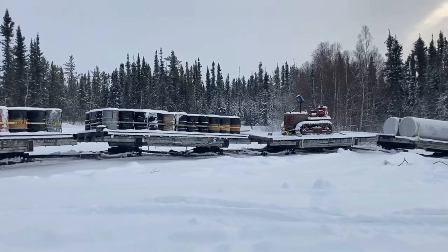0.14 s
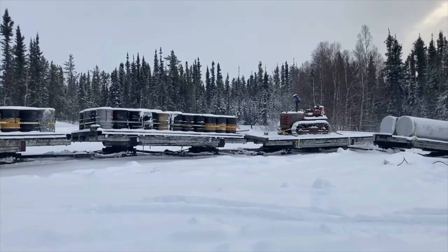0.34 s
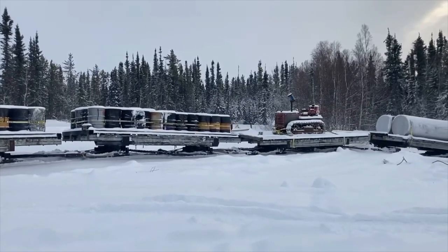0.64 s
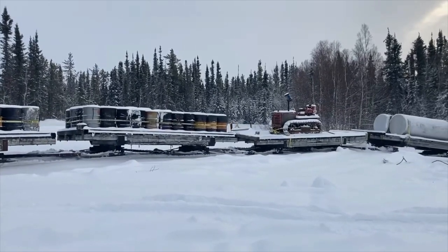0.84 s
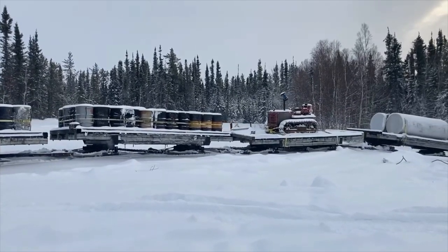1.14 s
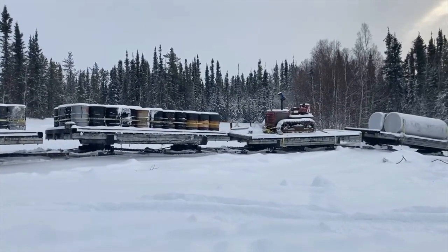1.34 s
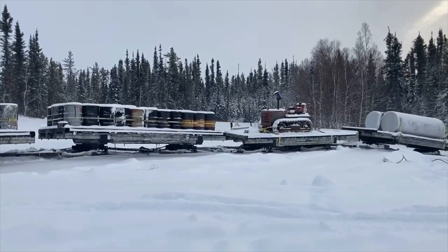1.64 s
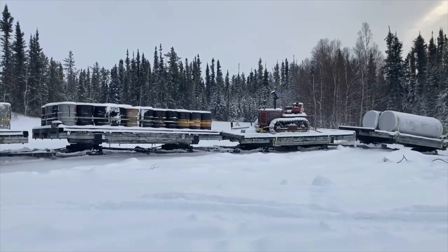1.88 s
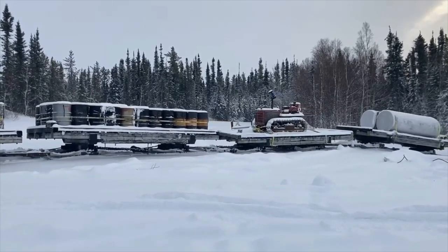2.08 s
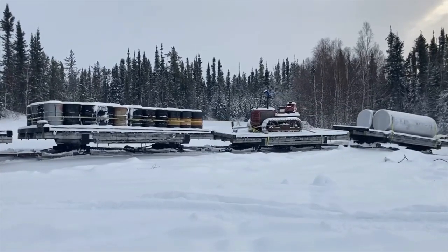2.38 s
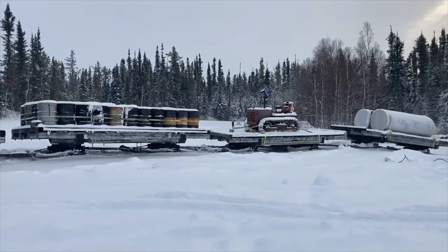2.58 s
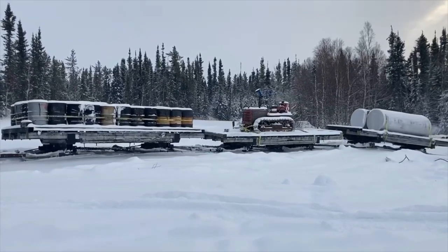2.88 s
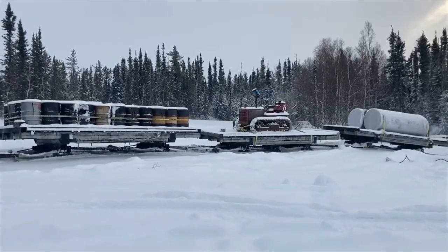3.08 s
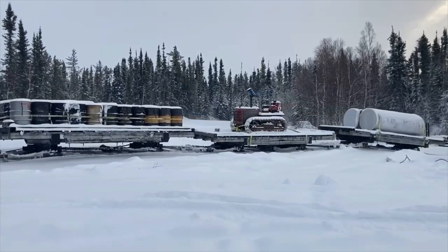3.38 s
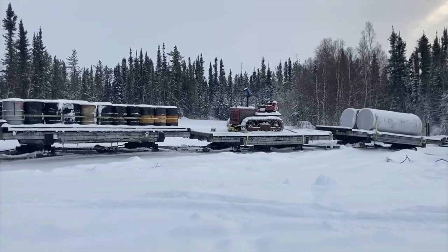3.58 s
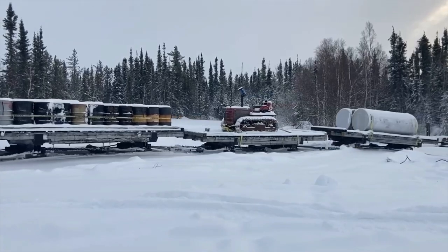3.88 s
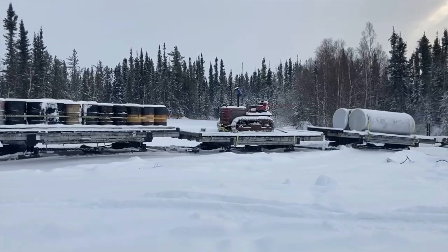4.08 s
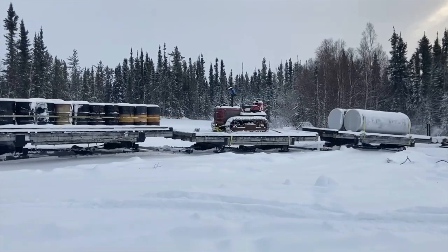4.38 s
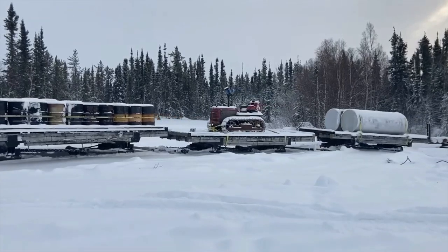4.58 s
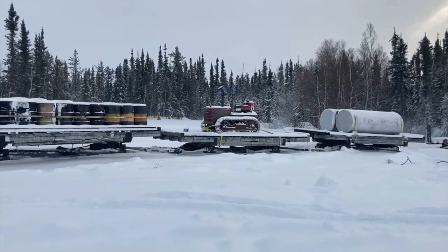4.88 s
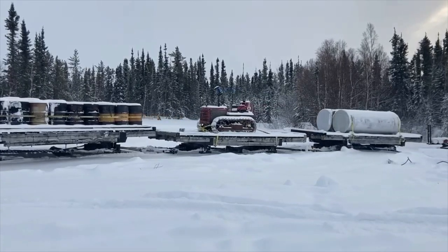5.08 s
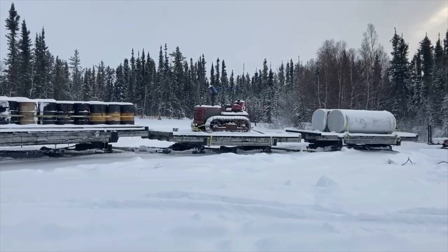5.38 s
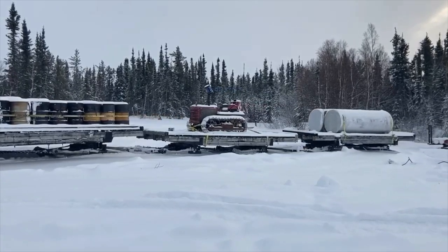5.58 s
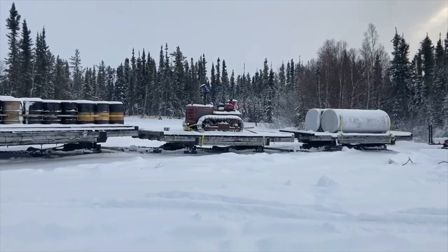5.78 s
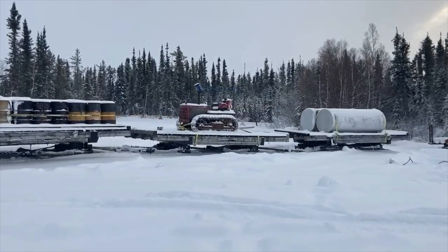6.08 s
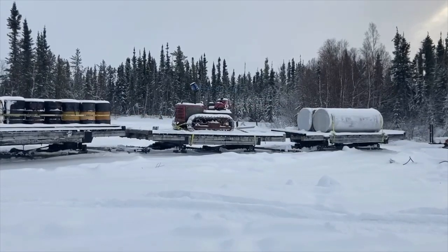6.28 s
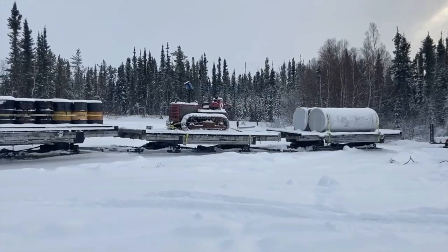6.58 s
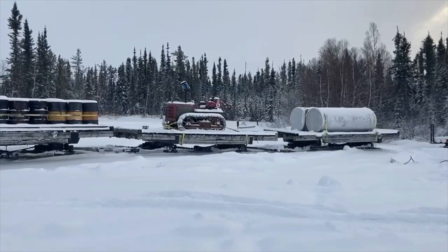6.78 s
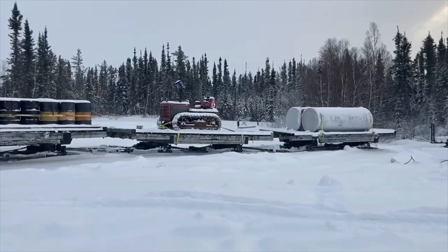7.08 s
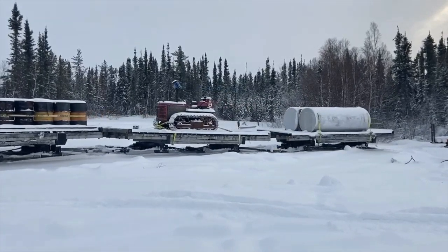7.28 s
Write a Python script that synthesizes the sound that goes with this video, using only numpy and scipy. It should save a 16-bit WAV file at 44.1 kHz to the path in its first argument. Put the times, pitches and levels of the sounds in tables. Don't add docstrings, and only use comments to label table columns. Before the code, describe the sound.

A rapid, uneven diesel clatter rides on a deep exhaust hum and rough fan and track roar. The engine labors early, drops slightly in pitch and recovers to a steadier, lighter pull. Metallic pins clink and a chain snaps taut, while dragged sleighs rub over packed snow, more audible toward the end. Open winter air, slightly wide stereo, slightly gritty handheld sound.

```python
import sys
import numpy as np
from scipy import signal
from scipy.fft import rfft, irfft, next_fast_len
from scipy.io import wavfile
from scipy.ndimage import uniform_filter1d

SR = 44100
rng = np.random.default_rng(int(sys.argv[2]) if len(sys.argv) > 2 else 0)


def inscribe(sig):
    pcm = np.round(np.clip(np.atleast_2d(sig).T, -1, 1) * 32767)
    wavfile.write(sys.argv[1], SR, pcm.astype(np.int16))


def amp(db):
    return 10 ** (np.asarray(db, float) / 20)


N = 328104


def rms_one(x):
    return x / np.sqrt(np.mean(x ** 2))


def in_time(rows):
    start_s, *columns = np.transpose(rows)
    return [np.interp(np.arange(N) / SR, start_s, column) for column in columns]


def colour(x, spectrum):
    pitch_hz, level_db = np.transpose(spectrum)
    size = next_fast_len(N + 4096)
    bin_hz = np.arange(size // 2 + 1) * SR / size
    gain = amp(np.interp(np.log(bin_hz + 1), np.log(pitch_hz), level_db))
    return irfft(rfft(x, size) * gain, size)[..., :N]


def resonance(x, hz, width):
    r = np.exp(-np.pi * width / SR)
    feedback = [1, -2 * r * np.cos(2 * np.pi * hz / SR), r * r]
    return signal.lfilter([(1 - r * r) / 2, 0, (r * r - 1) / 2], feedback, x)


def drift(rate):
    lowpass = signal.butter(2, rate, fs=SR, output="sos")
    return rms_one(signal.sosfilt(lowpass, rng.standard_normal(N + SR))[SR:])


def turning():
    return np.minimum(np.arange(N) / SR, 3.43)


def follow(control_db, level_db, share, lag_s, away_db):
    mean_control_db = -24
    r = np.exp(-1 / (max(lag_s, .001) * SR))
    start_db = control_db[0]
    lagged_db = signal.lfilter([1 - r], [1, -r], control_db - start_db) + start_db
    return level_db + share * (lagged_db - mean_control_db) + away_db * np.arange(N) / SR


def runner_hiss():
    # pitch_hz, level_db per Hz
    snow = [(200, -21.5), (450, -4), (680, 0), (1100, -5), (2000, -22), (5000, -48)]
    # start_s, level_db
    runners = [(0, -35.5), (1.2, -35), (2.4, -36), (3.4, -31.5), (4.6, -28.5), (6.0, -30.5), (7.44, -27)]
    hiss = rms_one(colour(rng.standard_normal((3, N)) * amp(2.4 * drift(6.8)), snow))
    scatter_db = [[0], [5], [5]]
    return amp(in_time(runners)[0] + scatter_db) * hiss


def stack_rumble(pulse_db):
    # pitch_hz, level_db per Hz
    turbulence = [(15, -26), (50, -6), (115, -14), (230, -7), (430, -5), (520, -10), (1500, -50)]
    return amp(0.39 * pulse_db - 19.0) * rms_one(colour(rng.standard_normal((3, N)), turbulence))


def fan_and_track_roar(thud, roar_db):
    # pitch_hz, level_db per Hz
    roar_spectrum = [(250, -9), (500, -1.3), (900, 1), (1500, -0.4), (2000, 0.4), (2700, -1.2), (3700, -9),
                     (6000, -13.5), (11000, -21.5), (12000, -46), (13000, -90)]
    throb = amp(1.92 * drift(23)) * (1 + 0.42 * thud)
    roar = rms_one(colour(rng.standard_normal((3, N)) * throb, roar_spectrum))
    cowl_db = -1 - 4 * np.maximum(turning() - 1.5, 0)
    roar += amp(cowl_db) * resonance(roar, hz=1350, width=700)
    return amp(roar_db + 0.2) * roar


def chain():
    # start_s, peak_db
    snaps = [(2.0313, -27), (2.511, -22), (2.8998, -26), (2.9492, -12.5), (2.9991, -37), (3.05, -18),
             (3.0974, -21), (4.5261, -22)]
    # pitch_hz, width_hz, level_db
    link = [(4230, 590, 10), (6100, 530, 22), (11000, 900, 11)]
    start_s, peak_db = np.transpose(snaps)
    clicks = np.zeros(N)
    clicks[(start_s * SR).astype(int)] = amp(peak_db)
    clicks += 1e-18
    return sum(amp(level_db) * resonance(resonance(clicks, hz, width), hz, 2 * width)
               for hz, width, level_db in link)


def clanks():
    # start_s, pitch_hz, level_db
    pins = [(0.0517, 11370, -41.3), (0.125, 10510, -28.6), (0.4196, 4310, -23.7), (0.4914, 10160, -31.3),
            (1.3643, 5510, -28.2), (1.4442, 10680, -33.1), (1.5262, 4130, -25.6), (1.7119, 3450, -25.1),
            (1.8433, 3100, -22.0), (2.0827, 4310, -20.3), (2.1117, 3450, -24.3), (2.2155, 4650, -21.1),
            (2.3178, 4310, -17.8), (2.3294, 3100, -19.7), (2.3432, 5510, -25.0), (2.5116, 6720, -27.7),
            (2.6248, 3960, -24.0), (2.7009, 4480, -21.1), (2.7532, 3960, -24.5), (2.7757, 3960, -23.8),
            (2.8004, 5860, -20.3), (2.9244, 9990, -34.0), (2.9484, 6200, -24.3), (3.013, 4310, -24.7),
            (3.1494, 4310, -25.3), (3.3177, 5340, -26.4), (3.3663, 3790, -25.3), (3.5151, 10850, -34.1),
            (3.6624, 5860, -28.7), (3.7654, 4130, -26.9), (3.8112, 6200, -31.5), (3.8148, 4310, -25.8),
            (3.9091, 8440, -30.9), (4.4287, 5680, -28.2), (4.5259, 3270, -23.1), (4.5513, 3960, -24.2),
            (4.5745, 9130, -33.2), (4.8299, 3960, -27.2), (4.8408, 4310, -25.4), (4.9177, 4130, -26.2),
            (4.9881, 3790, -27.7), (5.0142, 5170, -30.5), (5.4329, 3450, -26.1), (5.8785, 4310, -25.1),
            (6.1012, 3960, -29.8), (6.1767, 9990, -39.9), (6.353, 5340, -28.3), (6.4031, 5680, -30.9),
            (6.9836, 5680, -29.4), (7.1323, 3620, -27.4), (7.2056, 5680, -21.6), (7.2296, 5510, -30.6),
            (7.2789, 5680, -24.2), (7.329, 4650, -26.6), (7.4277, 3620, -27.8), (7.4277, 5680, -28.9)]
    rise_s, fade_s = 0.0009, 0.007
    start_s, hz, db = np.array(pins).T[:, :, None]
    since = np.arange(SR // 40) / SR
    shape = (1 - np.exp(-since / rise_s)) * np.exp(-since / fade_s)
    neighbour_hz = hz * rng.uniform(.95, 1.05, hz.shape)
    pair = np.sin(2 * np.pi * hz * since) + .5 * np.sin(2 * np.pi * neighbour_hz * since)
    out = np.zeros(N + SR)
    at = (start_s * SR).astype(int) + np.arange(SR // 40)
    np.add.at(out, at, amp(db - 2) * shape / shape.max() * pair)
    return out[:N]


def bonnet(turns):
    # start_firings, level_db
    slaps = [(3.95, 0), (.85, -2), (4.5, -5), (3.15, -6), (5.0, -3), (1.85, -4), (5.65, -4), (1.2, -6)]
    # pitch_hz, width_hz, level_db, rise_db per second of turning
    panels = [(403, 20, -2.5, 0), (500, 90, -11.5, 0.5), (594, 130, -12, 4.5), (657, 108, -13, 2.5)]
    cycle = 6 * np.arange(int(turns[-1] / 6) - 1)[:, None]
    firing, slap_db = np.transpose(slaps)
    chance = rng.standard_normal((len(cycle), 2, len(slap_db)))
    at = np.interp(cycle + firing + .012 * chance[:, 0], turns, np.arange(N)).astype(int)
    clicks = np.zeros(N)
    clicks[at] = amp(slap_db + 1.8 * chance[:, 1])
    clicks += 1e-18
    rings = [amp(db + rise * turning()) * rms_one(resonance(resonance(clicks, hz, width), hz, 2 * width))
             for hz, width, db, rise in panels]
    return amp(-40) * sum(rings)


def knock_shape(turns, load, strain_db):
    # lag_firings, length_firings, tick_db light load, tick_db full load, thud_db
    knocks = [(0.22, 0.18, -7, -3.5, -18), (0.19, 0.17, -11, 0, -12.5), (0.16, 0.16, -10, -5.5, 0),
              (0.17, 0.081, -11, -4, -20), (0.079, 0.22, -0.5, -1.5, 6), (0.24, 0.16, -13, -3, 2.5)]
    # start_s, peak_db
    hard_firings = [(0.0548, -9), (0.126, -12), (0.1984, -19), (0.2728, -16), (0.416, -13.5), (0.7048, -13),
                    (0.85, -10), (0.9226, -18.5), (1.068, -13), (1.289, -14), (1.365, -13), (1.5213, -8.5),
                    (1.5995, -8), (1.643, -11.5), (1.7644, -12.5), (1.83, -15), (1.938, -19), (2.0823, -10),
                    (2.16, -19), (2.214, -10), (2.304, -23), (2.406, -8), (2.469, -13), (2.586, -13),
                    (2.6233, -11), (2.698, -14), (2.7242, -21), (2.7736, -9), (2.8474, -20), (2.9003, -20),
                    (3.1448, -11.5), (3.368, -11), (3.5134, -13), (3.588, -11), (3.66, -11.5),
                    (3.7973, -21), (3.8831, -16), (3.9586, -10), (4.0318, -9), (4.1067, -13), (4.3998, -11),
                    (4.474, -13), (4.5256, -16.5), (4.5487, -8), (4.695, -10.5), (4.7685, -21),
                    (4.913, -16.5), (4.987, -16), (5.3544, -19), (5.429, -13.5), (5.5054, -15.5),
                    (5.8002, -16), (5.8747, -11), (6.6927, -14), (6.764, -14.5), (7.0564, -24),
                    (7.13, -14.5), (7.202, -11), (7.277, -10.5), (7.424, -12)]
    lag, length, light_db, full_db, thud_db = np.transpose(knocks)
    chance = np.clip(rng.standard_normal((int(turns[-1]) + 3, 4)), -2, 1.2) * [.03, .7, 1.1, 1.6]
    number = np.floor(turns + .35).astype(int) + 1
    start_s, peak_db = np.transpose(hard_firings)
    top = ((start_s + 0.0031) * SR).astype(int)
    struck = number[top]
    over_db = peak_db - strain_db[top]
    hard = np.zeros(len(chance), bool)
    hard[struck] = True
    chance[struck, 0] = np.clip(turns[top] + 1.02 - struck - lag[(struck - 1) % 6], -.25, .25)
    chance[struck, 1:] = 0.72 * (over_db - over_db.mean())[:, None] / 2
    cylinder = (number - 1) % 6
    slip, both_db, tick_db, dull_db = chance[number].T
    hard = hard[number]
    late = turns + 1.02 - number - lag[cylinder] - slip
    soft_width = length[cylinder] * np.where(late < 0, .88, 1.1)
    width = np.where(hard, np.where(late < 0, .17, .18), soft_width)
    bell = np.exp(-.5 * (late / width) ** 2)
    soft_db = light_db[cylinder] * (1 - load) + full_db[cylinder] * load
    bright_db = np.where(hard, 2, soft_db)
    thud = bell * amp(thud_db[cylinder] + both_db + dull_db)
    return bell, bright_db + both_db + tick_db, thud


def uneven_ticks(metal, bell, tick_db, turns):
    edges = [0, 3000, 5400, 8000, 10000, 22050]
    bite = [.62, .8, 1.05, 1.1, 1.0]
    hz = np.arange(N // 2 + 1) * SR / N
    own = amp(2.0 * np.clip(rng.standard_normal((int(turns[-1]) + 3, len(edges))), -2, 2))
    number = np.floor(turns + 1.35).astype(int)
    total = 0
    for k, (low, high) in enumerate(zip(edges, edges[1:])):
        strength = .22 + bell * amp(bite[k] * tick_db) * own[number, k]
        total = total + rfft(metal * strength) * ((hz >= low) & (hz < high))
    return irfft(total, N)


def block_knock(turns, bell, tick_db, knock_db):
    # pitch_hz, level_db per Hz
    tick = [(1000, -6.5), (2000, 3.5), (3000, -7.5), (3750, -4), (4200, 1.5), (5200, -2.5), (5800, -4.5),
            (7500, -7.5), (8200, -2.5), (10000, -13), (10800, -13), (11700, -16), (12000, -24),
            (13000, -52)]
    # pitch_hz, width_hz, level_db
    castings = [(1850, 120, -7), (4230, 140, 0), (6720, 130, -10), (10930, 230, -3)]
    metal = rng.standard_normal((3, N)) * amp(1.2 * rng.standard_normal((3, N)))
    ticks = colour(uneven_ticks(metal, bell, tick_db, turns), tick)
    rings = sum(amp(db) * resonance(ticks, hz, width) for hz, width, db in castings)
    return amp(knock_db + 1.5) * rms_one(ticks + rings)


def exhaust_pulses(turns, load):
    pulses = [(0.39, 0.027), (-0.55, 0.00071), (-0.22, -0.045), (0.37, 0.013), (-0.33, -0.045),
              (-0.25, -0.032)]
    # pitch_hz, width_hz, level_db, rise_db per second of turning
    stack = [(57.7, 13, -11, 0.5), (193.9, 2.7, 9.5, 2.2), (221.5, 15.5, 1.5, 2), (238.2, 37, 1, 2.84),
             (314, 70, -15.5, 2.5), (425, 22, -5, -1.5), (720, 240, -18, 4.5)]
    excess, lag = np.transpose(pulses)
    number = np.arange(int(turns[-1]))
    cylinder = number % 6
    chance = rng.standard_normal((len(number), 2))
    at = np.interp(number + .25 + lag[cylinder] + 0.004 * chance[:, 0], turns, np.arange(N)).astype(int)
    strength = 0.76 + excess[cylinder] * (1.2 - 0.25 * load[at])
    clicks = np.zeros(N)
    clicks[at] = -strength * (1 + 0.016 * chance[:, 1])
    puffs = signal.sosfilt(signal.butter(4, 500, fs=SR, output="sos"), clicks + 1e-18)
    rings = sum(amp(db + rise * turning()) * resonance(puffs, hz, width) for hz, width, db, rise in stack)
    rings -= .45 * (1 - load) * resonance(rings, hz=163, width=35)
    return rings / np.sqrt(uniform_filter1d(rings ** 2, size=SR // 4))


def firing_hum(turns, hum_db, load):
    # multiple of firing rate, level_db
    suborders = [(.5, -45), (2 / 3, -38.5), (5 / 6, -44)]
    # multiple, level_db, rise_db per second of turning, lug_db under load, push (sign is phase)
    upper_orders = [(2, -45, -0.5, -5, 1), (13 / 6, -34.5, -2.9, -13, -1), (15 / 6, -44, -0.5, -15, 1),
                    (17 / 6, -42.5, -1.1, -3, 1), (21 / 6, -48.5, -.4, 3, -1), (4.5, -48.5, 2, 13, 2.5),
                    (26 / 6, -42, 1.5, -3, 1), (28 / 6, -42, -1, 0.1, 1), (29 / 6, -46.5, -0.77, 0.1, 1),
                    (4.5, -53, -3, 8, 0.5), (31 / 6, -43.5, -0.86, -4, -1), (32 / 6, -43, -0.35, 3.3, -1),
                    (4.5, -65, -1, 14, -2)]
    phase = 2 * np.pi * turns
    hum = amp(hum_db + 0.29 * drift(7.5)) * np.cos(phase)
    for multiple, db in suborders:
        hum += amp(db) * np.cos(multiple * phase)
    for multiple, db, rise, lug_db, push in upper_orders:
        order = np.round(6 * multiple) / 6
        hum += np.sign(push) * amp(db + rise * turning() + lug_db * load) * np.cos(order * phase)
    return np.sqrt(2) * hum


def ports(direct, scattered):
    # pitch_hz, width_hz
    port_steps = [(570, 1070), (1820, 600), (2730, 420), (3700, 260), (4880, 480), (6100, 280), (7760, 400),
                  (10200, 700)]
    # pitch_hz, level_db
    balance = [(60, 0.0), (150, 0.0), (350, 1.0), (860, 0.5), (2090, -0.5), (5070, -0.5), (12300, 0.0)]
    # pitch_hz, level_db
    trees = [(40, -9), (100, -11), (200, -12), (500, -10.5), (1200, -9), (1700, -5.5), (3300, -4),
             (5500, 0), (7000, -4), (9000, 0.5), (11000, 0)]
    size = next_fast_len(N + 4096)
    hz = np.arange(size // 2 + 1) * SR / size
    half_cycles = sum(np.clip((hz - at) / width + .5, 0, 1) for at, width in port_steps)
    balance_hz, balance_db = np.transpose(balance)
    lead = np.exp(.5j * np.pi * half_cycles)
    lead *= amp(np.interp(np.log(hz + 1), np.log(balance_hz), balance_db) / 2)
    near = rfft(direct, size)
    return irfft([near * lead, near / lead], size)[:, :N] + colour(scattered, trees)


def scene():
    # start_s, speed_rpm
    speed = [(0.0, 1602.0), (0.51, 1676.0), (1.15, 1645.3), (1.49, 1524.2), (1.78, 1477.2), (2.2, 1533.1),
             (2.92, 1617.3), (3.4, 1625.0), (3.97, 1620.6), (4.88, 1643.2), (6.17, 1589.0), (6.46, 1640.6),
             (6.71, 1655.9), (7.44, 1619.0)]
    # start_s, level_db
    effort = [(0.0, -26), (0.06, -24.5), (0.68, -26.5), (1.18, -26.5), (1.6, -22), (1.9, -21.5),
              (3.21, -25.5), (4.72, -26.5), (5.22, -28), (5.62, -27), (5.74, -28), (6.36, -27), (6.4, -28),
              (6.94, -30), (7.4, -28), (7.44, -26.5)]
    # start_s, level_db
    clatter = [(0.0, -28.5), (0.14, -29), (1.04, -32.5), (2.15, -27), (2.2, -25.5), (4.35, -30.5),
               (4.54, -28.5), (6.67, -32.5), (6.69, -31.5), (6.86, -34), (7.19, -28.5), (7.44, -30.5)]
    # level_db at mean, share of swing, lag_s, away_db per second
    effort_rules = [(-22.5, 1.9, .002, 0.63), (-25, 1.51, 0.24, -0.09)]
    # level_db at mean, share of swing, lag_s, away_db per second
    strain_rules = [(-27.5, 1.32, .002, -0.075), (-25, 0.84, .002, 0.027)]
    turns = -.305 + np.cumsum(in_time(speed)[0]) / 20 / SR
    hum_db, pulse_db = [follow(in_time(effort)[0], *rule) for rule in effort_rules]
    knock_db, roar_db = [follow(in_time(clatter)[0], *rule) for rule in strain_rules]
    load = np.clip((hum_db + 27.0) / 9.9, 0, 1)
    bell, tick_db, thud = knock_shape(turns, load, knock_db)
    noise = runner_hiss() + stack_rumble(pulse_db) + fan_and_track_roar(thud, roar_db)
    noise += block_knock(turns, bell, tick_db, knock_db)
    direct = noise[0] + chain() + clanks() + bonnet(turns)
    direct += amp(pulse_db + 2.5) * exhaust_pulses(turns, load) + firing_hum(turns, hum_db, load)
    thinning = amp(-.6 * np.maximum(np.arange(N) / SR - 3.0, 0))
    return ports(direct, noise[1:] * thinning)


def band_gate(x, below_db, waver_db, floor_db):
    gate_edges = [20, 130, 860, 1000, 1120, 1250, 1380, 1520, 1900, 2050, 2200, 2370, 2550, 2950, 3150,
                  3400, 3750, 4150, 4650, 5100, 5600, 6000, 6400, 6900, 7600, 8300, 8900, 9500, 10000,
                  10300, 11000, 11450, 11800, 12100, 22050]
    pair = np.array([x[0] + x[1], x[0] - x[1]]) / 2
    hz, _, frames = signal.stft(pair, SR, "cosine", nperseg=2048, noverlap=1024)
    shared_db = waver_db * rng.standard_normal((2, frames.shape[-1]))
    for low, high in zip(gate_edges, gate_edges[1:]):
        band = (hz >= low) & (hz < high)
        level_db = 10 * np.log10(np.mean(abs(frames[:, band]) ** 2, axis=1) + 1e-20)
        chance_db = shared_db + .9 * waver_db * rng.standard_normal(level_db.shape)
        margin_db = level_db - level_db[::-1] + chance_db
        least_db = floor_db - 3 * (low > 11300) + 4 * (low > 11700) + 30 * (low > 12000)
        near_partner = margin_db > -below_db * (low / 1000) ** -.22
        frames[:, band] *= (near_partner & (level_db + chance_db > least_db))[:, None]
    total, difference = signal.istft(frames, SR, "cosine", nperseg=2048, noverlap=1024)[1][:, :N]
    return np.array([total + difference, total - difference])


def top_ticks(x):
    top = signal.sosfiltfilt(signal.butter(6, 11900, "high", fs=SR, output="sos"), x)
    power = top ** 2
    over = uniform_filter1d(power, size=80) / (uniform_filter1d(power, size=SR // 2) + 1e-20)
    return top * np.clip(over / amp(2 * 5) - 1, 0, 1)


def top_cut(x):
    return signal.sosfilt(signal.butter(12, 12900, fs=SR, output="sos"), x)


def record(dry):
    soft = 1.6 * np.tanh(dry / 1.6)
    gated = band_gate(soft, below_db=12, waver_db=2.2, floor_db=-78) + top_ticks(soft)
    return top_cut(gated)


dry = scene()
out = record(dry)
inscribe(out)
```